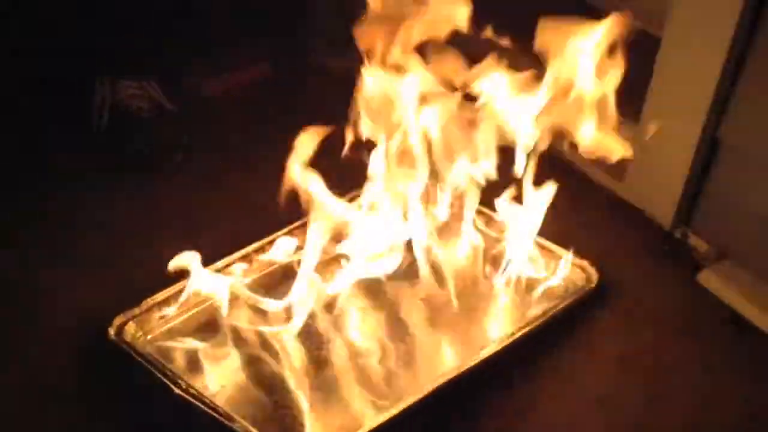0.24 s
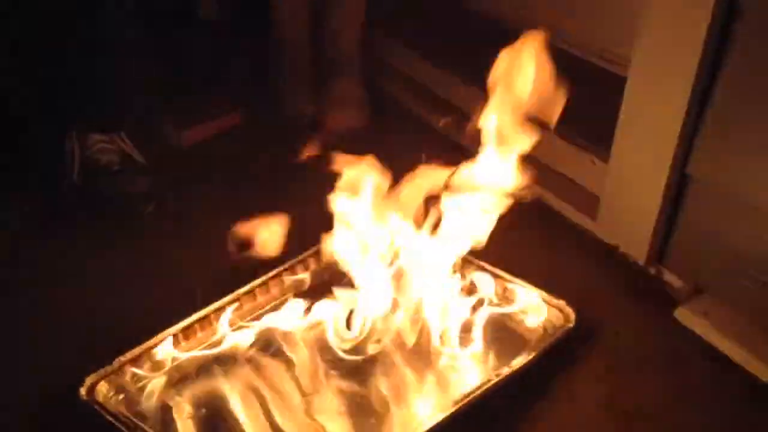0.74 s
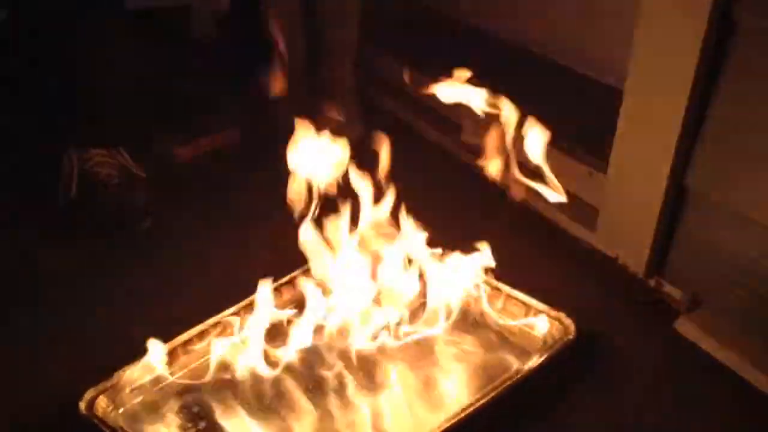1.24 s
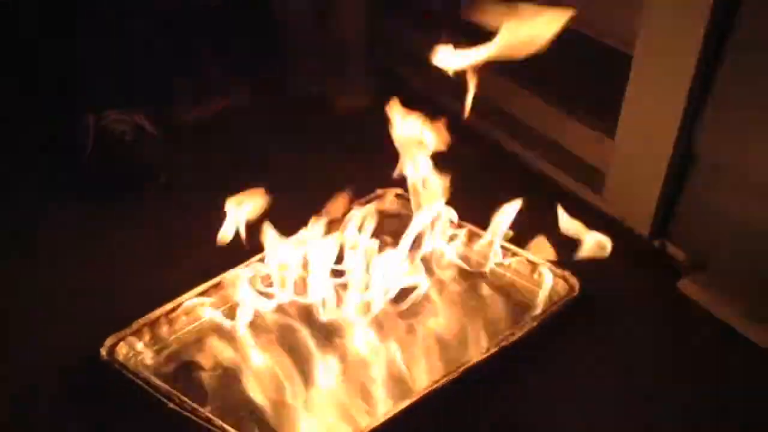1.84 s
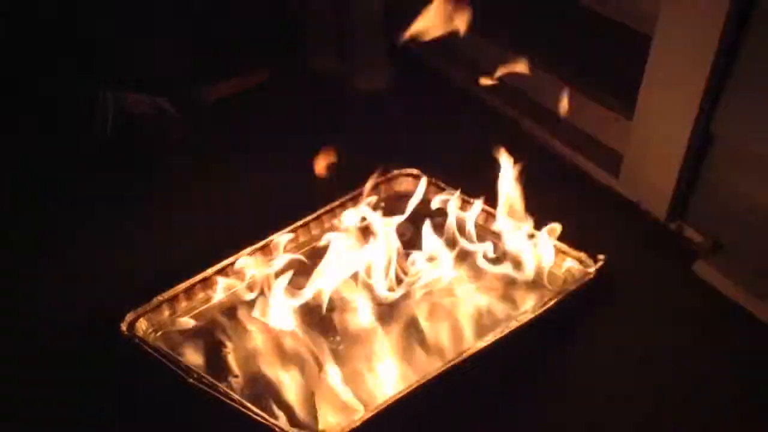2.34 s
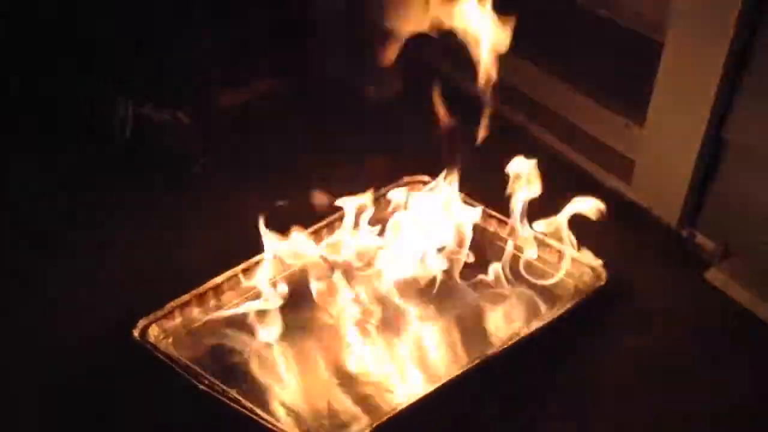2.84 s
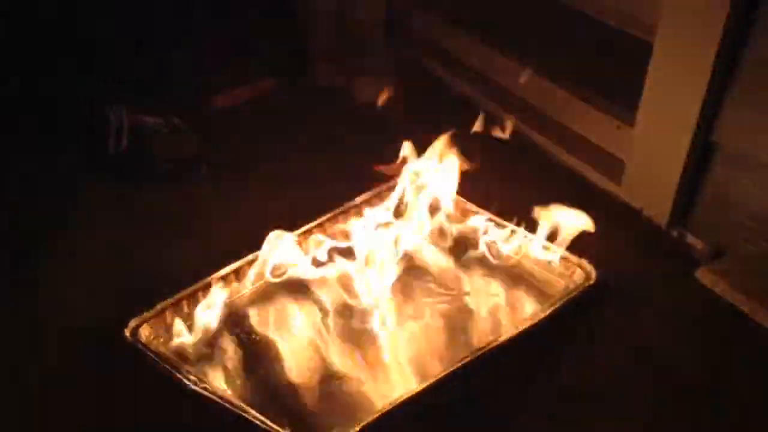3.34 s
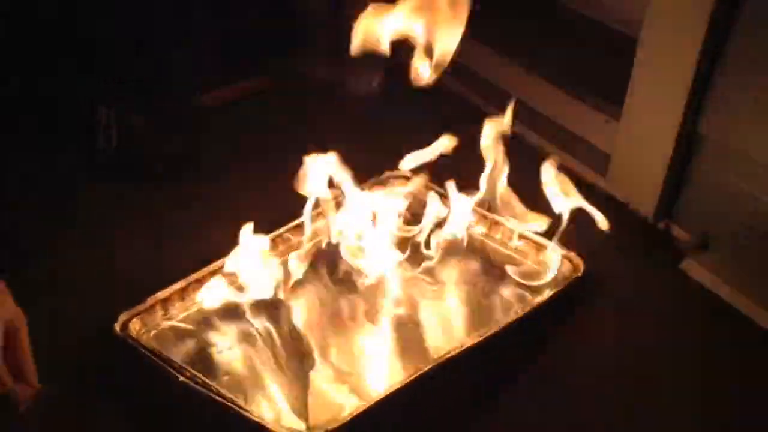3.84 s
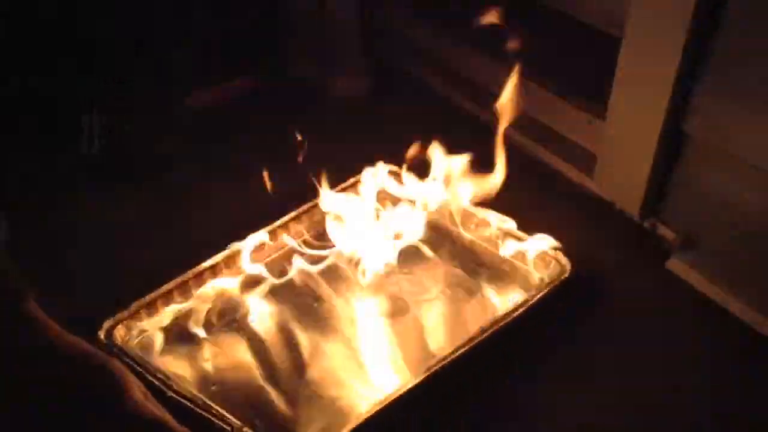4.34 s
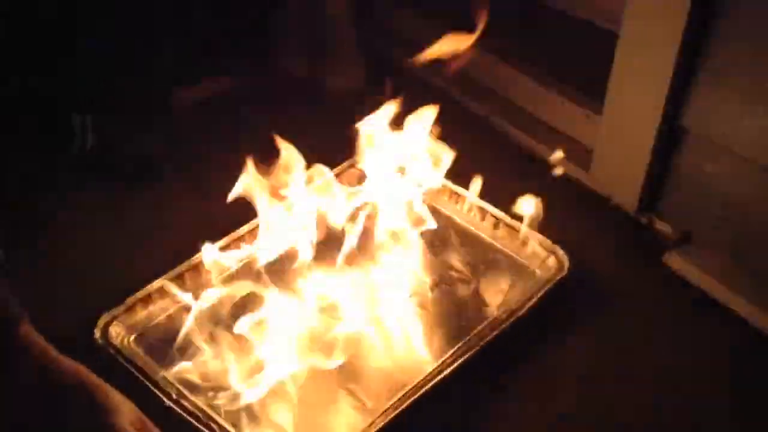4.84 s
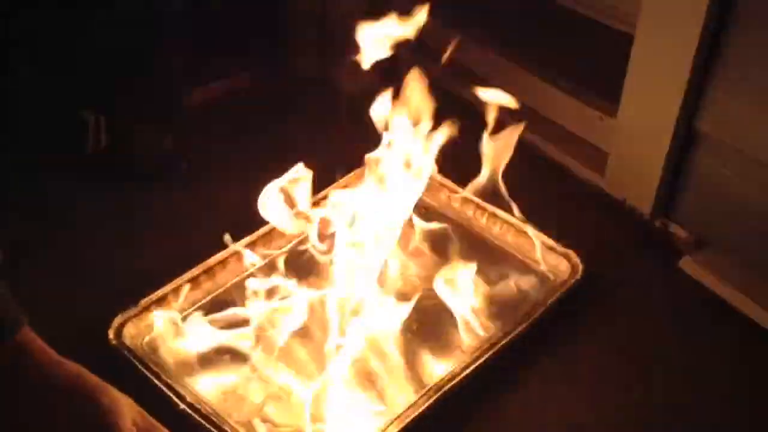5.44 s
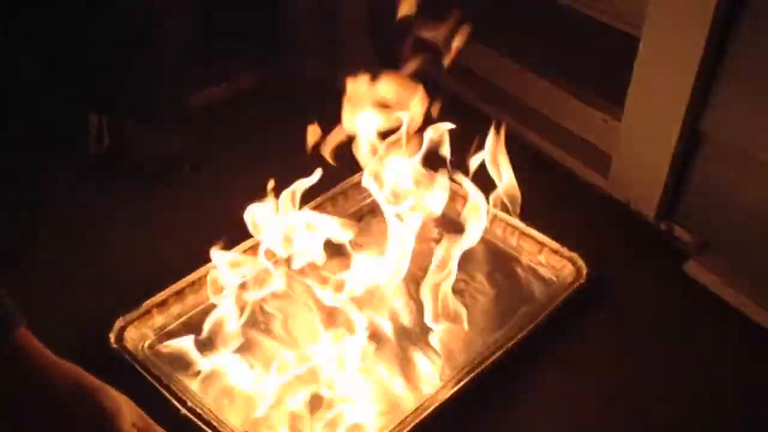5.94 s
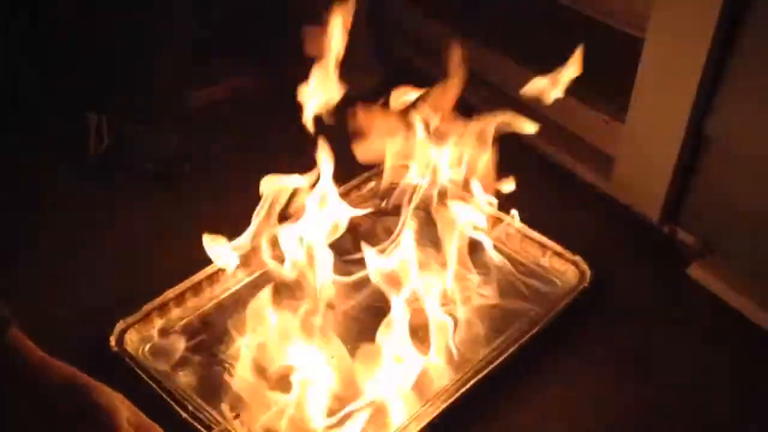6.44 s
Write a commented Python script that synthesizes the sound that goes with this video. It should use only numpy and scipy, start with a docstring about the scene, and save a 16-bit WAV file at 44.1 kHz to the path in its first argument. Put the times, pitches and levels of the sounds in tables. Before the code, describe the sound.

Shoes slap and scuff on concrete, ringing between hard walls, while a pan fire hisses faintly and cloth rustles close to the microphone.

```python
"""A concrete floor between hard walls, at night: alcohol burns in a foil pan, with only a faint rumble and
hiss. Shoes slap and scuff at a distance: banded noise that holds while the sole drags, then rings away. Cloth
rustles close to the microphone, once in a long sweep, as grainy noise; short noise bursts are its ticks. The
flames are steady coloured noise, raised and lowered, with puffs of rumble and random crackle."""
import sys
import numpy as np
from scipy import signal
from scipy.io import wavfile

SR = 44100
rng = np.random.default_rng(int(sys.argv[2]) if len(sys.argv) > 2 else 0)


def store_wav(level_fs):
    """Save 16-bit WAV to argv[1]."""
    pcm = np.round(np.clip(np.atleast_2d(level_fs), -1, 1) * 32767)
    wavfile.write(sys.argv[1], SR, pcm.T.astype(np.int16))


N = 294225   # length in samples

# Shoes on concrete. Each row: start in seconds, level in dB, colour centre in Hz, tilt in dB per octave,
# heel thud (boost or cut of the lows) in dB, drag of the sole in seconds, ring time t60 in seconds.
FOOTSTEPS = [(0.001, -7.5, 2350, -7, -8, 0.044, 1), (0.185, -17.5, 1520, -1, -3, 0.029, 0.44),
             (0.37, -15.5, 1930, -3.5, 1, 0.019, 0.64), (0.725, -37, 940, -7, -7, 0.017, 0.3),
             (0.808, -21, 1860, -4.5, 5, .01, 0.51), (0.9, -10.5, 1790, -2, 2.5, 0.033, 0.71),
             (1.088, -18, 1800, -4, 1, 0.015, 0.49), (1.247, -22.5, 1480, -3, 1, 0.024, 0.66),
             (1.838, -35, 700, 1, 3, 0.034, 0.46), (1.908, -30.5, 1060, -2, 7, 0.026, 0.73),
             (2.182, -32.5, 1040, -2.5, 8, 0.023, 0.56), (2.805, -5.5, 1810, 0.4, 1, 0.012, 0.54),
             (3.48, -27.5, 1530, -2, 10, 0.018, 1), (3.538, -30.5, 1090, -6, 3.5, 0.05, 0.72),
             (4.156, -27.5, 1480, -1, 11, 0.022, 0.66), (4.274, -23, 2750, -3, 15, 0.012, 0.55),
             (4.325, -12, 2300, -3.5, -11, 0.014, 0.45), (4.815, -23, 2800, 4.5, -4, 0.023, 0.42),
             (4.886, -23, 1520, 3.5, 23, 0.019, 0.52), (5.010, -20, 2400, -4, 7, 0.037, 0.51),
             (5.063, -16, 2600, -3, 2, 0.058, .35), (5.394, -25.5, 1330, 0.5, 15, 0.064, 0.78),
             (5.598, -7, 2370, -3, 2, 0.032, 0.81), (5.701, -13, 2410, -3, 0.5, 0.063, 0.57),
             (6.179, -27.5, 1470, -4.5, 2, 0.023, 0.69), (6.646, -14.5, 2250, -6.5, -6.5, 0.046, 0.55)]
# Colour of a step centred on 1800 Hz. Each row: frequency in Hz, relative level in dB per Hz.
STEP_COLOUR = [(120, -62), (300, -31), (600, -18), (1000, -8), (1750, 0), (2600, -4), (4000, -10),
               (6500, -23), (11000, -36.5), (15000, -57.5)]
STEP_CENTRE_HZ = 1800
# Ringing between the walls. Each row: frequency in Hz, ring time there as a multiple of the step's t60.
WALL_RING = [(300, 0.97), (800, 1.32), (2000, 0.81), (5000, 0.39), (12000, 0.32)]


def steps():
    """A slap fills the room within milliseconds, lasts while the sole drags, then dies, treble fastest."""
    hop = 8   # envelopes are computed at every 8th sample
    age = np.arange(0, 1.3, hop / SR)
    build = 1 - np.exp(-age / 0.00053)
    out = np.zeros(N)
    for hz, noise in bands(grain_db=3.0, from_hz=110):
        power = np.zeros(N // hop + 1 + len(age))
        thud_share = 1 / (1 + (hz / 700) ** 4)   # the heel sounds in the low bands only
        ring_share = at_hz(WALL_RING, hz)
        drag_share = min(ring_share, 1) ** 0.87
        for s, step_db, centre_hz, tilt_db, thud_db, drag_s, t60_s in FOOTSTEPS:
            colour_db = at_hz(STEP_COLOUR, hz * STEP_CENTRE_HZ / centre_hz)
            colour_db += tilt_db * np.log2(max(hz, 500) / centre_hz)
            ringing_s = np.maximum(age - drag_s * drag_share, 0)
            fall_db = -60 * ringing_s / (t60_s * ring_share)
            level_db = step_db + colour_db + thud_share * thud_db + fall_db
            at = round(s * SR / hop)
            power[at:at + len(age)] += from_db(2 * level_db) * build ** 2
        out += np.repeat(np.sqrt(power), hop)[:N] * noise
    return out


# One long sweep of cloth. Each row: time in seconds, level in dB, tilt in dB per octave.
CLOTH_SWEEP = [(4.455, -63, 9), (4.549, -39.5, 0), (4.645, -32.5, 0.5), (4.775, -32.5, -0.5),
               (4.921, -24, -2.1), (4.99, -25, -2.8), (5.033, -15, 3), (5.133, -22, 2), (5.17, -31.5, 0.5),
               (5.215, -27, .9), (5.335, -33, -2.5), (5.4, -36, 2.5), (5.455, -41, -1.5), (5.6, -38.5, 0.5),
               (5.67, -41.5, 5), (5.76, -40.5, -6), (5.85, -51, -5)]
# Short brushes of cloth. Each row: time of the peak in seconds, level in dB, tilt in dB per octave,
# rise in seconds, fall in seconds.
CLOTH_BRUSHES = [(0.001, -27.5, -7.5, 0.016, 0.076), (0.12, -33.5, -5, 0.33, 0.37),
                 (0.204, -31, 1, 0.016, .05), (0.714, -44, 0, .09, 0.027), (0.918, -39.5, 6, 0.044, 0.17),
                 (1.072, -44, 6, .015, .04), (1.232, -45, -0.5, 0.37, 0.31),
                 (1.334, -41.5, -1.5, .02, 0.056), (1.822, -38.5, 0, 0.0092, 0.11),
                 (2.0, -46.5, 1, 0.15, .015), (2.104, -38.5, 1.5, .01, .09), (2.3, -47.5, -1, 0.35, 0.23),
                 (2.36, -34.5, -2.5, .013, 0.044), (2.61, -46, -0.2, 0.14, 0.022),
                 (2.745, -45, -4.5, 0.017, .02), (2.806, -34.5, -4, 0.0061, .12),
                 (3.246, -47, -2.5, .03, .15), (4.276, -35.5, -4, .007, 0.025),
                 (4.372, -46, -8, .14, 0.057), (6.27, -48, -3.5, .055, 0.19),
                 (6.315, -38, -0.5, .02, 0.059), (6.438, -49.5, -5.5, 0.099, 0.16)]
BRUSH_RANGE_DB = 20   # gained in the rise time, lost in the fall time


def rubbing():
    """Level and tilt of the cloth: sweep and brushes add in power, and the loudest dominates the tilt."""
    t = np.arange(N) / SR
    level_db, tilt_db = in_time(CLOTH_SWEEP)
    sweeping = (CLOTH_SWEEP[0][0] < t) * (t < CLOTH_SWEEP[-1][0])
    power = from_db(2 * level_db) * sweeping + 1e-20
    tilted = power * tilt_db
    for s, peak_db, brush_tilt_db, rise_s, fall_s in CLOTH_BRUSHES:
        away = np.maximum((s - t) / rise_s, (t - s) / fall_s)
        brush = from_db(2 * (peak_db - BRUSH_RANGE_DB * np.minimum(away, 10)))
        power = power + brush
        tilted = tilted + brush * brush_tilt_db
    return 10 * np.log10(power), tilted / power


# Colour of rubbing cloth. Each row: frequency in Hz, relative level in dB per Hz.
CLOTH_COLOUR = [(150, -57), (400, -16), (900, -14.5), (2800, -1.5), (5000, -1.5), (10600, 1), (14500, -0.5),
                (15500, -3)]


def rustle():
    """Rubbing cloth: dense bright grains of noise that waver in level and colour with the strokes."""
    level_db, tilt_db = rubbing()
    level_db = level_db + 1.08 * drift(24.0)
    tilt_db = np.clip(tilt_db, -9, 7)
    direct = np.zeros(N)
    for hz, noise in bands(grain_db=2.5, from_hz=140):
        colour_db = at_hz(CLOTH_COLOUR, hz) + tilt_db * np.log2(max(hz, 800) / 10000)
        direct += from_db(level_db + colour_db + 1.2 * drift(7.3)) * noise
    near = np.clip((level_db + 50) / 12, 0, 1)   # faint strokes are far and share the floor reflection
    return near * direct + (1 - near) * floor_reflection(direct)


# Cloth ticks near the microphone. Each row: start in seconds, level before the decay in dB, centre in Hz.
CLOTH_TICKS = [(0.203, -19, 13500), (0.2793, -26, 10300), (0.7102, -32.5, 5000), (0.813, -30, 4170),
               (0.8627, -32, 9700), (1.013, -36, 6000), (1.073, -28, 13500), (1.144, -33, 6000),
               (1.1695, -34.5, 5460), (1.178, -35, 6000), (1.2121, -38, 9900), (1.3352, -43, 4150),
               (1.822, -31, 10000), (1.8404, -31.5, 3510), (1.998, -36, 4630), (2.1023, -31, 9600),
               (2.3554, -27, 4330), (2.7458, -30, 4690), (2.767, -35, 4830), (3.2442, -35, 4580),
               (4.275, -26, 3930), (4.2944, -31, 4410), (4.9253, -18, 4250), (5.006, -13, 10700),
               (5.128, -18, 9950), (5.152, -25, 8000), (5.1925, -20, 8500), (5.22, -23, 9000),
               (5.234, -18, 10200), (5.2616, -19, 5150), (5.2938, -15.5, 5930), (5.3285, -21.5, 6000),
               (5.6016, -18, 3560), (5.6223, -22, 3000), (5.7023, -29, 3620), (6.132, -46, 4800),
               (6.308, -35, 8600), (6.444, -43, 3900), (6.621, -45, 3520)]
TICK_OCTAVES, TICK_T60_S = 0.95, 0.009   # width to each side of the centre; decay time


def ticks():
    """A snap of fibres: a dry broad click of noise that dies within milliseconds."""
    age = np.arange(8192) / SR
    out = np.zeros(N + len(age))
    spread = 2 ** TICK_OCTAVES
    decay = from_db(-60 * age / TICK_T60_S)
    for s, level_db, hz in CLOTH_TICKS:
        edges_hz = [hz / spread, min(hz * spread, 0.45 * SR)]
        sos = signal.butter(2, edges_hz, "band", fs=SR, output="sos")
        snap = rms_one(signal.sosfilt(sos, rng.standard_normal(len(age))))
        at = round(s * SR)
        out[at:at + len(age)] += from_db(level_db) * snap * decay
    return out[:N]


# Background over time. Each row: time in seconds, flame rumble in dB, flame hiss in dB, room flutter in dB.
BED_LEVELS = [(0.0, -35, -24, -38), (0.1, -46.5, -48, -34.5), (0.4, -50, -44.5, -41),
              (0.7, -60, -54, -55), (1.05, -57.5, -47.5, -51.5), (1.35, -56.5, -53, -54.5),
              (1.7, -57, -49.5, -56.5), (2.0, -57.5, -52.5, -50), (2.8, -60, -47.5, -58),
              (2.97, -56.5, -46, -48.5), (3.35, -58.5, -51, -53.5), (3.8, -55.5, -53.5, -54),
              (4.15, -55, -52, -48.5), (5.7, -54.5, -45.5, -44.5), (6.05, -57, -53.5, -55),
              (6.3, -57.5, -54, -51), (6.45, -50.5, -63, -56.5), (6.67, -61, -49.5, -53)]
# Colours of the three layers. Each row: frequency in Hz, relative level in dB per Hz.
RUMBLE_COLOUR = [(20, -65), (50, -39), (95, -15.5), (135, -15.5), (180, -3.5), (230, 1), (300, -9.5),
                 (400, -11), (700, -60)]
HISS_COLOUR = [(1500, -10), (3000, -10.5), (5000, -2), (8500, -6), (13000, -17), (15500, -18)]
FLUTTER_COLOUR = [(250, -3), (370, 5.5), (460, -13.5), (620, 7), (1300, 2), (2700, -3), (5000, -16.5),
                  (9000, -12)]


def background():
    """Background as three noises: low flame rumble swelled by puffs, a mid flutter of the room's late ringing,
    and bright flame hiss."""
    rumble_db, hiss_db, flutter_db = in_time(BED_LEVELS)
    rumble_gain = np.hypot(from_db(rumble_db), puffs())   # the powers add
    rumble = rumble_gain * steady(RUMBLE_COLOUR, patchy_db=2.5)
    hiss = from_db(hiss_db) * steady(HISS_COLOUR, patchy_db=3.0)
    flutter = from_db(flutter_db) * steady(FLUTTER_COLOUR, patchy_db=3.5)
    return rumble, flutter, hiss


# Puffs of the flames, brief swells of the rumble. Each row: time of the peak in seconds, level in dB.
FLAME_PUFFS = [(0.2, -41.5), (0.903, -51), (1.038, -47), (1.312, -54), (3.098, -56), (3.258, -53),
               (3.951, -60), (4.2, -59), (4.375, -49), (4.49, -48.5), (5.029, -60), (5.153, -53),
               (5.448, -55), (6.051, -53.5)]
PUFF_S = 0.03   # from the peak to 1/e of it


def puffs():
    """Gain of the puffs: each swells and sinks along a bell curve."""
    t = np.arange(N) / SR
    return sum(from_db(level_db) * np.exp(-((t - s) / PUFF_S) ** 2) for s, level_db in FLAME_PUFFS)


CRACKLE_PER_S, CRACKLE_DB = 72, -57   # mean rate of pops; size of the smallest, before the high-pass


def crackle():
    """Tiny random pops of the burning foil: bright, dry, quickly decaying noise."""
    born = rng.random(N) < CRACKLE_PER_S / SR
    sizes = from_db(CRACKLE_DB + 6.7 * np.minimum(rng.exponential(1, N), 3.2))
    envelope = signal.lfilter([1], [1, -0.97], born * sizes + 1e-18)
    bursts = envelope * rng.standard_normal(N)
    return signal.sosfilt(signal.butter(2, 3000, "high", fs=SR, output="sos"), bursts)


# Reflections off floor and walls lift and cancel fixed bands.
# Each row: centre in Hz, width in Hz, lift or cut in dB.
ROOM_BANDS = [(390, 40, 5), (500, 40, 4), (610, 60, 1.5), (720, 60, -8), (1010, 60, 2.5), (1180, 100, 2.5),
              (1360, 70, 3), (1770, 120, 3), (2300, 120, 3)]


def room_reflections(x):
    """Sound delayed by floor and walls adds to the direct sound in some bands and cancels it in others."""
    return coloured(x, ROOM_BANDS)


# The floor cancels two bands of hiss and distant cloth. Each row: centre in Hz, width in Hz, cut in dB.
FLOOR_DIPS = [(6250, 1500, -11), (11500, 600, -6)]


def floor_reflection(x):
    """The bounce off the floor partly cancels the direct sound in two treble bands."""
    return coloured(x, FLOOR_DIPS)


def coloured(x, peaks):
    """A chain of resonant peaks and dips."""
    for hz, width_hz, db in peaks:
        w, a = 2 * np.pi * hz / SR, from_db(db / 2)
        k = np.pi * width_hz / SR
        lift = [1 + k * a, -2 * np.cos(w), 1 - k * a]
        damp = [1 + k / a, -2 * np.cos(w), 1 - k / a]
        x = signal.lfilter(lift, damp, x)
    return x


def steady(colour, patchy_db):
    """Noise of a fixed colour at rms 1, each band wavering on its own."""
    out = np.zeros(N)
    for hz, noise in bands(0, colour[0][0] / 2, colour[-1][0] * 2):
        out += from_db(at_hz(colour, hz) + patchy_db * drift(9.5)) * noise
    return rms_one(out)


EDGES_HZ = 30 * 2 ** np.arange(0, 9.4, 1 / 3)   # third-octave band edges


def bands(grain_db, from_hz=0, to_hz=SR):
    """Third-octave bands of noise of equal power per Hz, as (centre Hz, noise); grain makes it crackle."""
    sizes = from_db(grain_db * np.minimum(rng.exponential(1, (2, N)), 6))
    white = rms_one(sizes * rng.standard_normal((2, N)))
    for k, (low, high) in enumerate(zip(EDGES_HZ, EDGES_HZ[1:])):
        if from_hz < low and high < to_hz:
            sos = signal.butter(2, [low, high], "band", fs=SR, output="sos")
            yield np.sqrt(low * high), signal.sosfilt(sos, white[k % 2])   # neighbours use different noise


def drift(rate_hz):
    """Slow random wander of spread 1: noise through two low-pass poles, at every 40th sample."""
    r = np.exp(-2 * np.pi * rate_hz * 40 / SR)
    noise = rng.standard_normal(N // 40 + 2002)
    slow = signal.lfilter([1], [1, -2 * r, r * r], noise)[2000:]   # skip the filter's start
    return np.interp(np.arange(N) / 40, np.arange(len(slow)), rms_one(slow))


def from_db(db):
    """Decibels to gain."""
    return 10 ** (np.asarray(db) / 20)


def rms_one(x):
    """Scale to rms 1."""
    return x / np.sqrt(np.mean(x ** 2) + 1e-20)


def in_time(rows):
    """Columns of a table as curves, read at every sample."""
    s, *columns = np.transpose(rows)
    return [np.interp(np.arange(N) / SR, s, column) for column in columns]


def at_hz(points, hz):
    """A spectrum read on a log-frequency axis."""
    points_hz, values = np.transpose(points)
    return np.interp(np.log(hz), np.log(points_hz), values)


def scene():
    """Steps and flutter take the room's colour, hiss and crackle the floor's; ticks and near cloth are dry."""
    rumble, flutter, hiss = background()
    far = room_reflections(steps() + flutter) + floor_reflection(hiss + crackle())
    close = rustle() + ticks()
    return (close + far + rumble)[None]


def record(dry):
    """The top is cut steeply: a low-pass that is 70 dB down from 15.7 kHz."""
    return signal.sosfilt(signal.cheby2(16, 70, 15700, fs=SR, output="sos"), dry)


dry = scene()
out = record(dry)
store_wav(out)
```